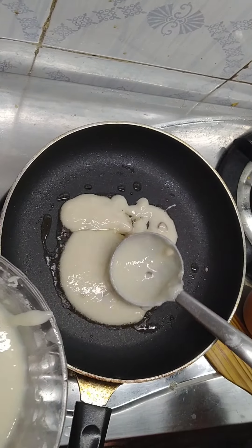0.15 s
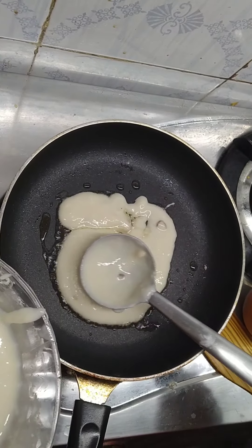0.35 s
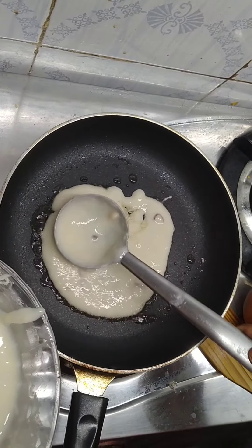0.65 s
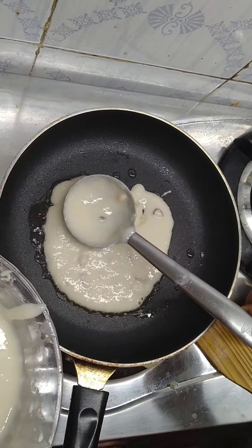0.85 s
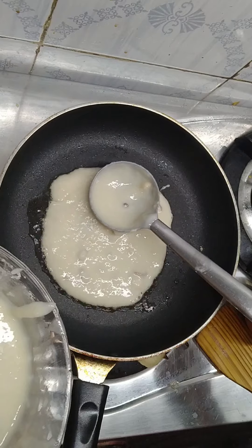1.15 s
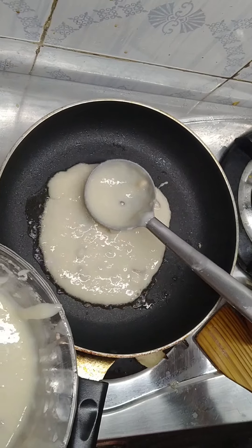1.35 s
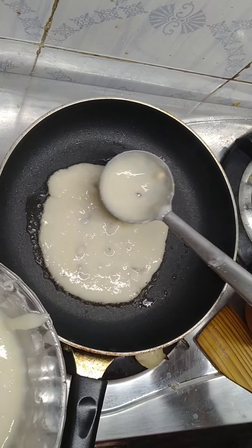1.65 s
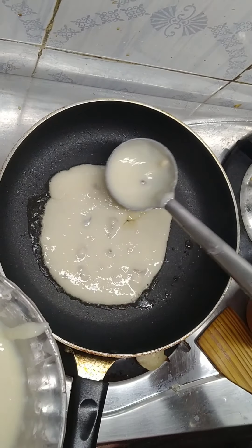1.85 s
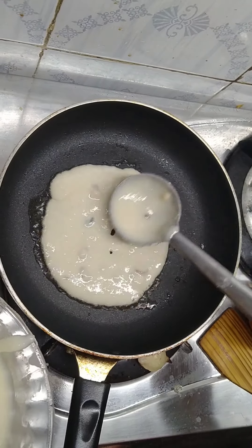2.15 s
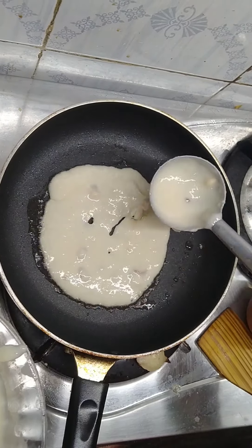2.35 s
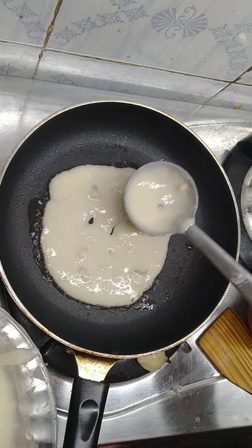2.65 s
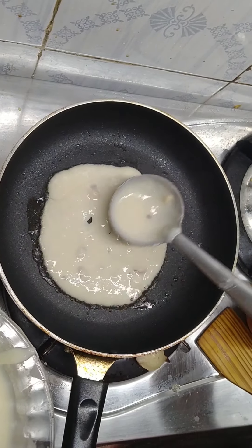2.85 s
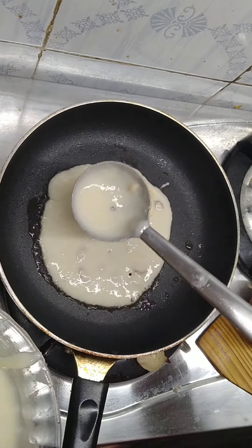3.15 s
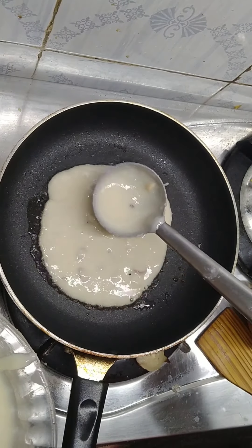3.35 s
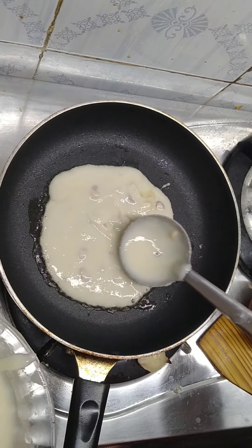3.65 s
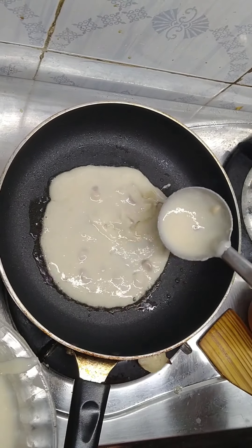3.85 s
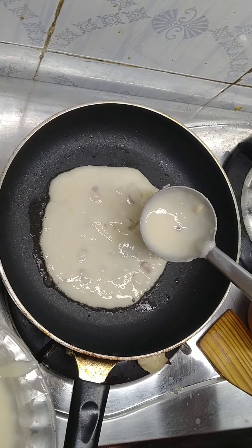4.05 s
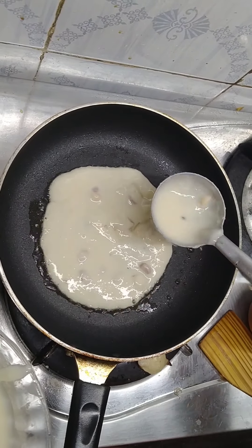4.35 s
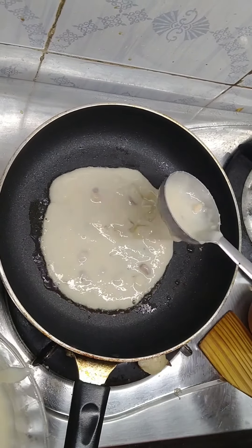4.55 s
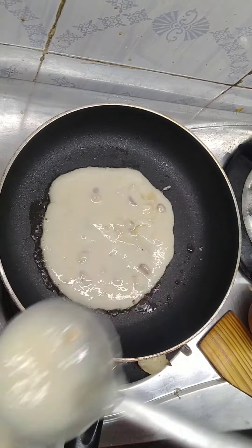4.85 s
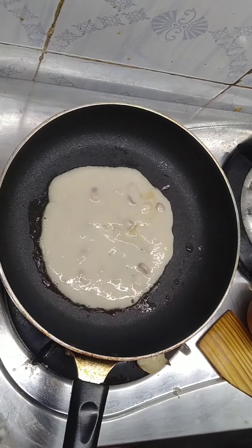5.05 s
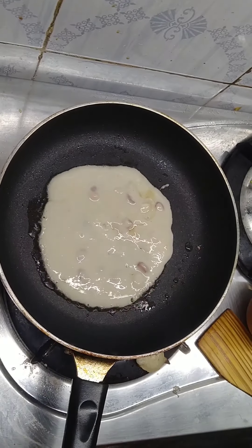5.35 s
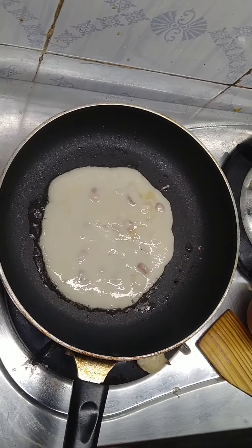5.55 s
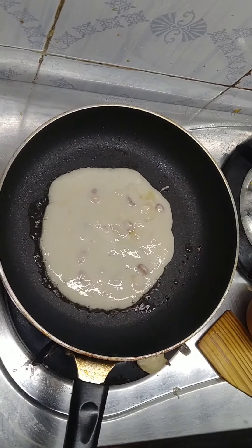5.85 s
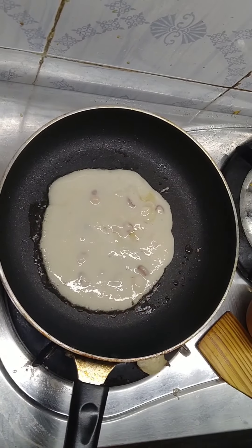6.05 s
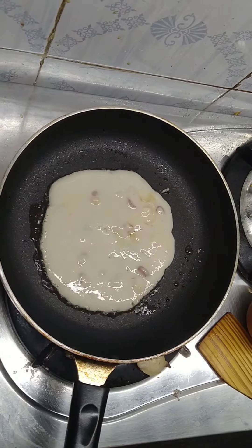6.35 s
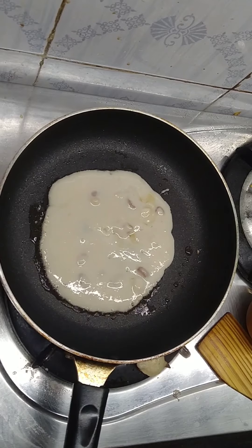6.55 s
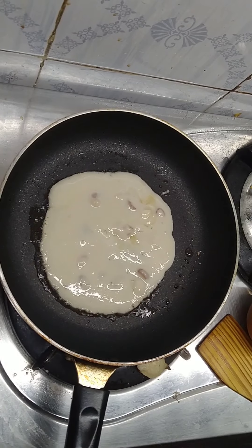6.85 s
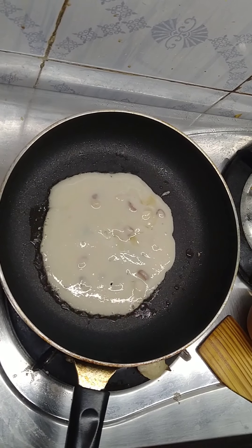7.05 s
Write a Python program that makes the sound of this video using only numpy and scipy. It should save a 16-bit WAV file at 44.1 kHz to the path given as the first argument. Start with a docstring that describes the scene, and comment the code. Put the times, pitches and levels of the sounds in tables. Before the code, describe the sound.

A surging, crackling sizzle of batter frying in a small kitchen fades gradually, with popping bubbles and one ringing clink near the end.

```python
"""Batter sizzles in a hot greased pan in a small tiled kitchen, swelling in surges and slowly dying down.
Steam bubbles burst by the thousand and ring the pan; large ones pop singly, and a drop of fat spits close
by. The ladle squelches in the batter, utensils tap, a faint tone passes and the stove drones low.
Near the end the bowl with its steel ladle is set down and rings, and steam spurts from under the batter."""
import sys
import numpy as np
from scipy import signal
from scipy.fft import rfft, irfft
from scipy.io import wavfile

SR = 44100
rng = np.random.default_rng(int(sys.argv[2]) if len(sys.argv) > 2 else 0)


def store_pcm(level_fs):
    """Save levels as 16-bit WAV."""
    pcm = np.round(np.clip(level_fs, -1, 1) * 32767).astype(np.int16)
    wavfile.write(sys.argv[1], SR, np.atleast_2d(pcm).T)


N = 317079
TIME = np.arange(N) / SR

# the steady sizzle, dying down as the batter cools the pan: time_s, level_db
STEADY_SIZZLE = [(0, -46.5), (1.2, -48), (2.0, -48), (2.9, -50), (3.45, -51), (4.05, -55.5), (4.7, -55.5),
                 (5.9, -58.5), (7.19, -56.5)]


def from_db(db):
    """Decibels to gain."""
    return np.exp(np.asarray(db) * (np.log(10) / 20))


def rms_one(x):
    """Scale to unit power."""
    return x / np.sqrt(np.mean(x ** 2) + 1e-20)


def automation(rows):
    """A curve over the whole scene, in straight lines between (time, value) points."""
    times, values = np.transpose(rows)
    return np.interp(TIME, times, values)


def add(out, start_s, sound):
    """Mix a short sound in at its start time."""
    at = max(0, round(start_s * SR))
    out[at:at + len(sound)] += sound[:N - at]


def drift(rate_hz):
    """A smooth random wander with a spread of one."""
    step, settle = 40, 2000
    pole = np.exp(-2 * np.pi * rate_hz * step / SR)
    noise = rng.standard_normal(N // step + settle + 2)
    slow = signal.lfilter([1], [1, -2 * pole, pole * pole], noise)[settle:]
    return np.interp(np.arange(N) / step, np.arange(len(slow)), rms_one(slow))


def dying(t60_s):
    """A half-second envelope that loses 60 dB in t60_s."""
    return np.exp(-np.log(1000) * TIME[:SR // 2] / t60_s)


def arch(start_s, length_s):
    """A half-sine rise and fall."""
    return np.sin(np.pi * np.clip((TIME - start_s) / length_s, 0, 1))


def response(colour, peaks=(), tilt_db=0, size=4096):
    """Minimum-phase impulse response of a colour with resonances and a tilt per octave above 1 kHz."""
    hz = np.maximum(np.arange(size // 2 + 1) * SR / size, 1)
    points = np.array(colour)
    db = np.interp(np.log(hz), np.log(points[:, 0]), points[:, 1])
    db = db + tilt_db * np.log2(np.maximum(hz / 1000, 1))
    for centre_hz, width_hz, lift_db in peaks:
        db = db + lift_db / (1 + (2 * (hz - centre_hz) / width_hz) ** 2)
    cepstrum = irfft(np.log(from_db(db)))
    cepstrum[1:size // 2] *= 2
    cepstrum[size // 2 + 1:] = 0
    return irfft(np.exp(rfft(cepstrum)))


def through(x, impulse):
    """Pass a sound through an impulse response."""
    return signal.oaconvolve(x, impulse)[:len(x)]


def high_cut(x, cutoff_hz=8113):
    """A steep low-pass takes off the top."""
    return signal.sosfilt(signal.ellip(10, .1, 70, cutoff_hz, fs=SR, output="sos"), x)


def kitchen(clicks, hob_db, room_db, hob_t60_s=0.016, room_t60_s=0.2):
    """Every click comes from another spot, so its reflections off hob and tiles are a fresh scatter."""
    tail_power = 0
    for t60_s, level_db in [(hob_t60_s, hob_db), (room_t60_s, room_db)]:
        decay = dying(t60_s) ** 2 * (TIME[:SR // 2] > .001)   # 1 ms pre-delay
        tail_power = tail_power + from_db(level_db) ** 2 * decay / decay.sum()
    envelope = np.sqrt(np.abs(through(clicks ** 2, tail_power)))
    return clicks + envelope * rng.standard_normal(len(clicks))


def snap(colour, hob_db, room_db, tilt_db=0, peaks=()):
    """One coloured click of height one, plus its reflections."""
    click = high_cut(response(colour, peaks, tilt_db))
    room = kitchen(signal.unit_impulse(SR // 2), hob_db, room_db)
    return through(room, click / np.abs(click).max())


def bursts(per_s, spread_db, clump_db):
    """Bubbles burst at random and in clumps: many small, few large."""
    bursting = rng.random(N) < per_s * from_db(clump_db * drift(18)) / SR
    sizes = from_db(spread_db * np.minimum(rng.exponential(1, N), 5))
    clicks = bursting * sizes * rng.choice([-1, 1], N)
    return rms_one(kitchen(clicks, hob_db=-2, room_db=-13))


def surges(rise_share=.42):
    """Batter runs onto hot fat: the sizzle's swell and its shift from wet bubbling to dry fizz, in dB."""
    # each surge: crest_s, length_s, lift_db, dry_shift_db
    swells = [(0.485, 0.31, 1, -0.5), (0.76, 0.24, 4, -1.5), (1.335, 0.26, 2.5, 1.5), (1.76, 0.22, 4, -2.5),
              (1.872, 0.19, 4, -1), (2.397, 0.71, 4.5, 0.5), (3.095, 0.14, 1, 3), (3.19, 0.53, 5, -1.5),
              (3.698, 0.21, 4, -1.5), (4.302, 0.41, 4, -1.5), (4.503, 0.081, 3.5, -2),
              (4.917, 0.29, 4, 0.5), (6.696, 0.18, 1, 0)]
    swell_db, dry_db = 0, 0
    for crest_s, length_s, lift_db, dry_shift_db in swells:
        corners_s = [crest_s - rise_share * length_s, crest_s, crest_s + (1 - rise_share) * length_s]
        bump = np.sin(np.pi / 2 * np.interp(TIME, corners_s, [0, 1, 0])) ** 2
        swell_db = swell_db + lift_db * bump
        dry_db = dry_db + dry_shift_db * bump
    return swell_db, dry_db


def sizzle_levels():
    """Crackle, fizz and wet bubbling in dB: each fades slowly and takes its share of the surges."""
    # the wet bubbling, dropping as the thin batter sets: time_s, level_db
    wet_bubbling = [(0, -57.5), (2.0, -57.5), (2.8, -63.5), (3.6, -61.5), (4.1, -64), (5.9, -68.5),
                    (7.19, -65)]
    steady_db = automation(STEADY_SIZZLE)
    swell_db, dry_db = surges()
    swell_db = swell_db + .5 * drift(rate_hz=5)   # uneven boiling
    crackle_db = steady_db - 0.44 + swell_db
    fizz_db = steady_db + 0.68 + 0.87 * swell_db + dry_db
    wet_db = automation(wet_bubbling) + 0.25 * swell_db - dry_db
    return crackle_db, fizz_db, wet_db


def round_bubbles(low_hz=2790, high_hz=3090, t60_s=0.035, wander_db=2.0, sizes=4):
    """Round bubbles ring briefly; now one size prevails, now another."""
    out, size_of_click = 0, rng.integers(0, sizes, N)
    clicks = bursts(per_s=1200, spread_db=3.5, clump_db=0.5)
    for size, pitch_hz in enumerate(np.geomspace(low_hz, high_hz, sizes)):
        ring = np.cos(2 * np.pi * pitch_hz * TIME[:SR // 2]) * dying(t60_s)
        out = out + from_db(wander_db * drift(2.0)) * through(clicks * (size_of_click == size), ring)
    return rms_one(out)


def sizzle():
    """Three sizes of steam bubble ring the pan; the sharpest bursts reach all three ranges at once."""
    # colours of the three bubble sizes: frequency_hz, level_db
    crackle_colour = [(1200, -37), (1900, -11.5), (2400, -5), (2750, -0.5), (3000, 1), (3330, -3),
                      (3900, -5.5), (4600, -19), (6500, -21)]
    fizz_colour = [(2800, -22.5), (3700, -1.5), (4400, -0.5), (4750, -4), (5300, -1.5), (6300, -1),
                   (8000, -0.5)]
    wet_colour = [(120, -18.5), (300, -15), (600, -12.5), (900, -7.5), (1200, -1.5), (1800, 0.5), (2300, 5),
                  (3200, -15.5)]
    # resonances of the pan: centre_hz, width_hz, lift_db
    pan_resonances = [(967, 41, 8.5), (1730, 64, 7), (2220, 94, 5.5), (3060, 180, 2.5), (3545, 260, 5.5),
                      (5940, 270, 0.5)]
    crackle_db, fizz_db, wet_db = sizzle_levels()
    sharp = bursts(per_s=1500, spread_db=3.5, clump_db=2.0)

    def bubbles(colour, per_s, spread_db, clump_db, sharp_share):
        clicks = bursts(per_s, spread_db, clump_db) + sharp_share * sharp
        return rms_one(high_cut(through(clicks, response(colour, pan_resonances))))

    crackle = bubbles(crackle_colour, per_s=1800, spread_db=4.0, clump_db=4.0, sharp_share=1.54)
    ringing_db = -5 + .35 * (crackle_db - crackle_db.max())   # fades faster than the crackle
    ringing = from_db(ringing_db) * round_bubbles()
    fizz = bubbles(fizz_colour, per_s=7000, spread_db=4.0, clump_db=2.0, sharp_share=0.71)
    wet = bubbles(wet_colour, per_s=3000, spread_db=3.5, clump_db=2.5, sharp_share=0.64)
    return from_db(crackle_db) * (crackle + ringing) + from_db(fizz_db) * fizz + from_db(wet_db) * wet


def stove():
    """The stove drones: a low rush with a few wavering tones."""
    # colour of the rush: frequency_hz, level_db
    rush_colour = [(25, -10.5), (85, 4), (130, -1), (200, 2.5), (400, -3.5), (800, -8.5), (2000, -15.5),
                   (6000, -31)]
    # tones of the hum: pitch_hz, rms_db
    hum_tones = [(107, -81.5), (146, -77), (205, -85.5), (244, -84.5)]
    out = from_db(-74.5) * rms_one(through(rng.standard_normal(N), response(rush_colour)))
    for pitch_hz, rms_db in hum_tones:
        phase = 2 * np.pi * pitch_hz * TIME
        wavering = (1.2 + drift(7.6)) * np.sin(phase) + drift(7.9) * np.cos(phase)
        out += from_db(rms_db) * rms_one(wavering)
    return out


def pop(level_db, tilt_db):
    """One bubble snaps open; the bigger and duller it is, the more it rings."""
    # colour of the snap: frequency_hz, level_db
    colour = [(300, -39), (1000, -32), (1900, -19.5), (2400, -8), (3000, 1.5), (3350, -8), (4500, -8),
              (6400, -11.5), (8000, -14)]
    # ring of the bubble at zero tilt: centre_hz, width_hz, lift_db
    resonance = [(3130, 71, 5.5)]
    ring = [(centre_hz, width_hz, lift_db - 0.6 * tilt_db) for centre_hz, width_hz, lift_db in resonance]
    return from_db(level_db) * snap(colour, hob_db=1.0, room_db=-10, tilt_db=tilt_db, peaks=ring)


def small_pops(per_s=2.0, above_sizzle_db=11.5, spread_db=3):
    """Lesser bubbles pop at random, weaker as the sizzle fades."""
    out, steady_db = np.zeros(N), automation(STEADY_SIZZLE)
    for at in np.flatnonzero(rng.random(N) < per_s / SR):
        level_db = steady_db[at] + above_sizzle_db + spread_db * rng.standard_normal()
        add(out, at / SR, pop(level_db, tilt_db=rng.normal(1.5, 3.5)))
    return out


def large_pops():
    """The largest bubbles snap open one by one."""
    # each pop: start_s, level_db, treble_tilt_db_per_octave
    cues = [(0.4401, -37, -8), (0.4654, -32, 7), (0.7002, -23, 5.5), (1.5501, -27, 8), (2.33, -30, -2),
            (2.4208, -25, 6), (2.783, -28, 7.5), (2.9622, -29, 9.5), (3.0527, -23, 8.5),
            (4.2213, -18, -0.5), (4.3114, -25, -3.5), (5.131, -30.5, 2.5), (5.54, -38, 7),
            (5.6679, -33, -2.5), (6.8692, -36, 1.5), (6.9206, -28.5, 11.5)]
    out = np.zeros(N)
    for start_s, level_db, tilt_db in cues:
        add(out, start_s, pop(level_db, tilt_db))
    return out


def squelches():
    """Thick batter smacks, soft and low, as the ladle pushes through it."""
    # ladle strokes: start_s, length_s, level_db
    strokes = [(0.498, .16, -68), (2.24, 0.21, -69)]
    # colour of the squelch: frequency_hz, level_db
    colour = [(100, -17), (210, 1), (420, -5.5), (900, -20.5), (3000, -42)]
    smacks = rms_one(through(bursts(per_s=400, spread_db=2.0, clump_db=0.5), response(colour)))
    envelope = sum(from_db(level_db) * arch(start_s, length_s) for start_s, length_s, level_db in strokes)
    return smacks * envelope


def fat_spit():
    """A drop of fat spits: a close, dry crack with a small puff under it."""
    # the spit: start_s, level_db
    cues = [(1.2916, -10.5)]
    # colour of crack and puff: frequency_hz, level_db
    colour = [(60, -21), (250, -8.5), (600, -6.5), (1200, -5.5), (1900, -13), (3000, -15), (4200, -19),
              (5100, -5), (5700, -0.5), (6400, 0), (8000, -6)]
    out = np.zeros(N)
    for start_s, level_db in cues:
        add(out, start_s, from_db(level_db) * snap(colour, hob_db=-9.5, room_db=-11))
    return out


def soft_tone(start_s=2.06, length_s=.075, pitch_hz=710, peak_db=-64):
    """One faint, pure tone swells and fades under the sizzle."""
    return from_db(peak_db) * arch(start_s, length_s) * np.sin(2 * np.pi * pitch_hz * TIME)


def utensil_taps():
    """Utensils touch further off, light and dull, heard mostly as reflections."""
    # each tap: start_s, level_db
    cues = [(2.809, -38), (4.913, -42.5), (6.503, -40), (6.569, -39), (6.738, -40)]
    # colour of a tap: frequency_hz, level_db
    colour = [(300, -17), (700, -14), (1000, -5.5), (1600, -4), (2800, -1), (4000, 0), (7000, -10)]
    out = np.zeros(N)
    for start_s, level_db in cues:
        add(out, start_s, from_db(level_db) * snap(colour, hob_db=3, room_db=6))
    return out


def bowl():
    """Bowl and ladle touch down: each knock rattles briefly and rings their modes; close pairs beat."""
    # each knock: start_s, strength_db
    knocks = [(6.3358, -44.5), (6.3382, -26.5)]
    # modes of bowl and ladle: pitch_hz, level_db, t60_s
    modes = [(105, -31, 0.33), (657, -27.5, 0.2), (718, -22, 0.27), (820, -34, .13), (1025, -19.5, 0.14),
             (1670, -24, 0.13), (2107, -13, 0.21), (2590, -17, .09), (2690, -9.5, .1), (2770, -15, 0.13),
             (3654, 0, 0.077), (3680, -10, 0.22), (3741, -14.5, 0.27), (4030, -18, 0.19),
             (4430, -23.5, 0.12), (5700, -19, 0.12)]
    # colour of the contact rattle: frequency_hz, level_db
    contact_colour = [(100, -43), (450, -34), (700, 7), (1050, 2), (1400, -4), (2700, 11.5), (4200, 7),
                      (5000, 4), (6400, 3.5), (8000, -9)]
    out, t = np.zeros(N), TIME[:SR // 2]
    ring = sum(from_db(level_db) * np.cos(2 * np.pi * pitch_hz * t) * dying(t60_s)
               for pitch_hz, level_db, t60_s in modes)
    for start_s, strength_db in knocks:
        rattle = snap(contact_colour, hob_db=1.0, room_db=11.5)
        add(out, start_s, from_db(strength_db) * (ring + rattle))
    return out


def steam_spurts(whistle_hz=3400, whistle_t60_s=0.079, release_t60_s=0.098):
    """Trapped steam escapes in a sputtering hiss with a whistle; it holds briefly, then dies."""
    # each spurt: start_s, level_db, hold_s, whistle_share
    cues = [(6.901, -51, 0.0079, .1), (6.921, -46.5, 0.025, 0.88)]
    # colour of the hiss: frequency_hz, level_db
    hiss_colour = [(1000, -35), (2300, -6), (4400, 6), (4900, -6), (5700, 2), (8000, -4)]
    out, t = np.zeros(N), TIME[:SR // 2]
    sputter = bursts(per_s=4000, spread_db=3.5, clump_db=3.0)
    hiss = rms_one(high_cut(through(sputter, response(hiss_colour))))
    whistle = rms_one(through(sputter, np.sin(2 * np.pi * whistle_hz * t) * dying(whistle_t60_s)))
    for start_s, level_db, hold_s, whistle_share in cues:
        envelope = np.zeros(N)
        add(envelope, start_s, from_db(level_db) * np.interp(t - hold_s, t, dying(release_t60_s)))
        out += envelope * (hiss + whistle_share * whistle)
    return out


def scene():
    """Everything reaches one microphone, the same in both channels."""
    mono = (sizzle() + large_pops() + fat_spit() + utensil_taps() + bowl() + steam_spurts()
            + soft_tone() + stove() + small_pops() + squelches())
    return np.array([mono, mono])


def record(dry):
    """The microphone rolls off the deep bass and the treble, then the top is cut."""
    # colour of the microphone: frequency_hz, gain_db
    microphone_colour = [(40, -19), (66, -11.5), (88, -0.5), (6300, 0), (6750, -9.5), (7050, -21.5),
                         (7500, -25.5), (7900, -42)]
    return np.array([high_cut(through(channel, response(microphone_colour))) for channel in dry])


dry = scene()
out = record(dry)
store_pcm(out)
```